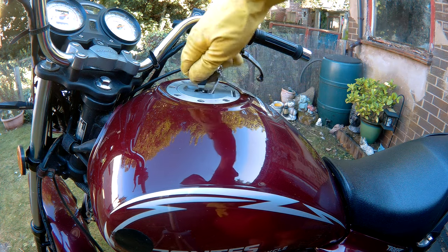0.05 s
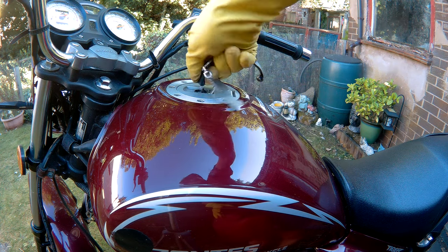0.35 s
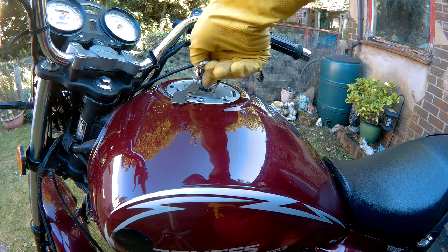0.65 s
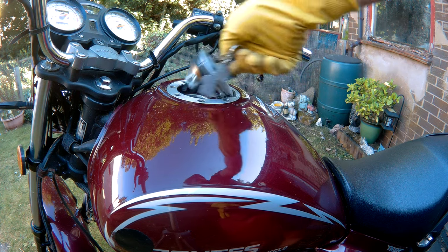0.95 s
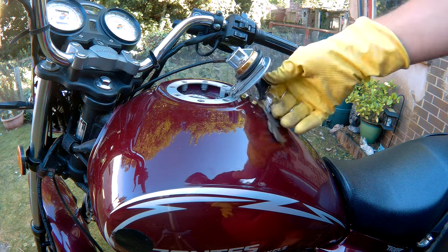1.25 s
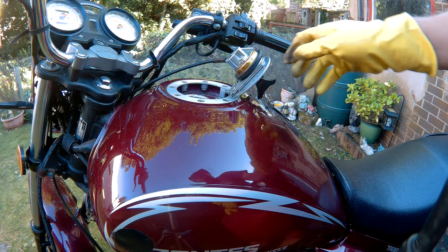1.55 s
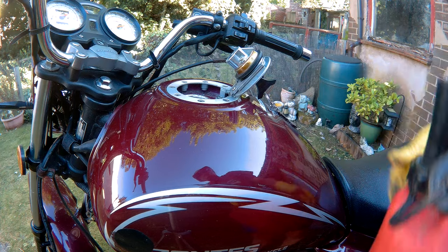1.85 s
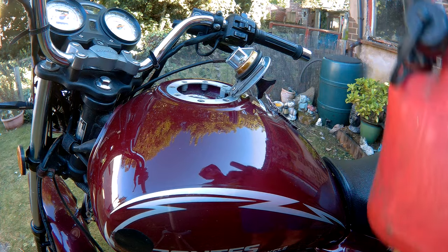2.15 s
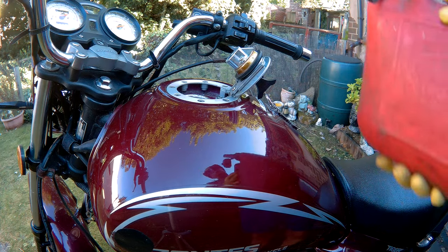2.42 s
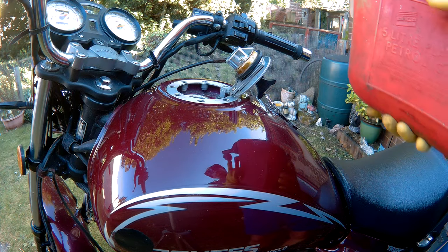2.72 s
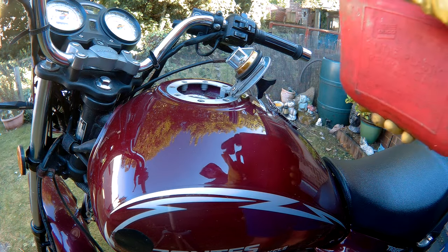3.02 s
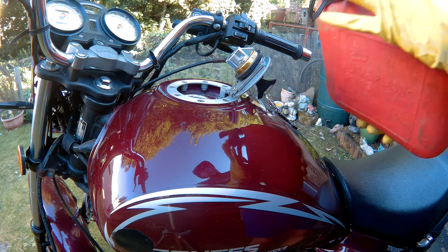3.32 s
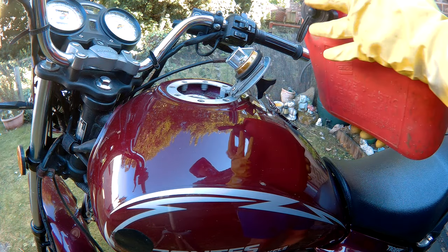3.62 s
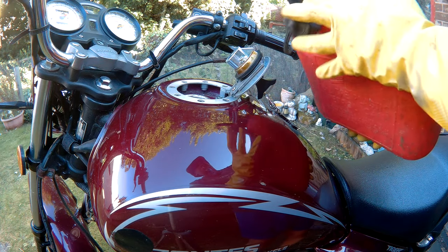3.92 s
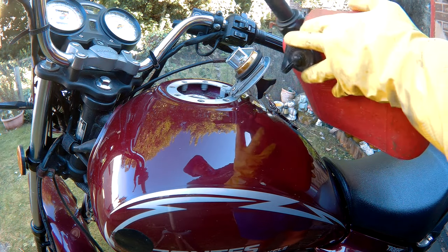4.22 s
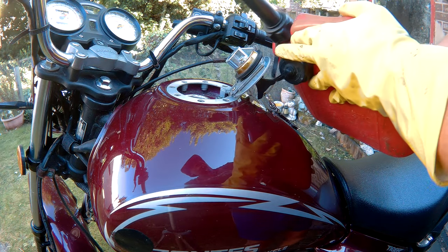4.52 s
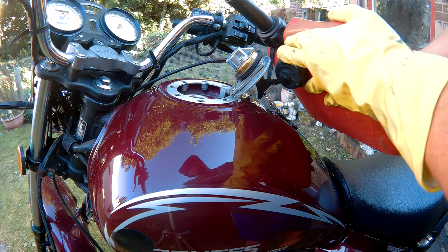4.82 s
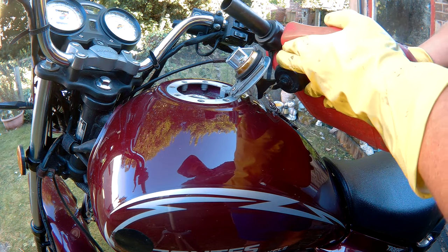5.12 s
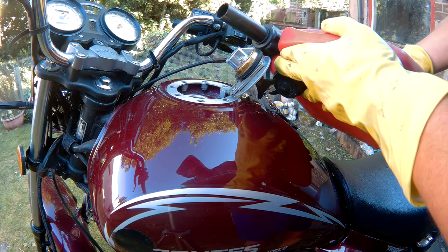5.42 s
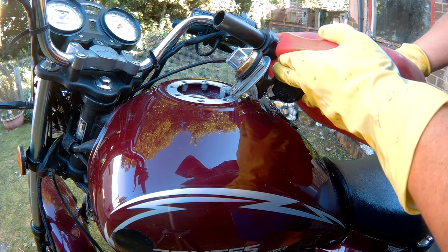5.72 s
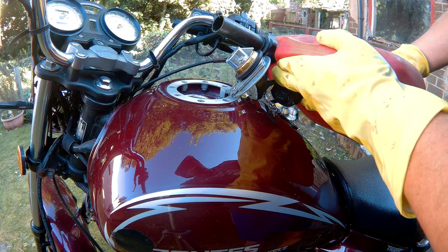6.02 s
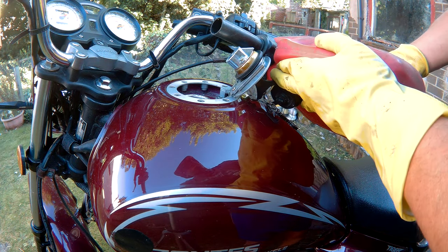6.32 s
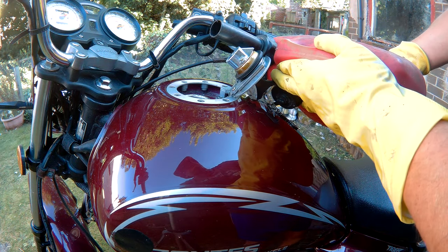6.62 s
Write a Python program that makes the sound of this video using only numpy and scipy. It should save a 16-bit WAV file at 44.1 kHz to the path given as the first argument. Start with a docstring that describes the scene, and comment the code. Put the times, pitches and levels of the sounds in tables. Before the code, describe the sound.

A key clicks in a motorcycle's metal fuel cap, which snaps open with jangling keys, then a plastic can knocks softly.

```python
"""In a quiet back yard a key is pressed into the locking cap of a motorcycle's steel fuel tank and turned.
The bolt slides back, and every click of the lock rings the hollow tank.
At about 1.3 s the cap springs open and hits its stop, and the keys swing against it.
Then gloved hands lift a plastic fuel can, which knocks softly a few times while the rubber scuffs on it.
Near 6 s a small bird chirps three times, far off."""
import sys
import numpy as np
from scipy import signal
from scipy.fft import rfft, irfft, next_fast_len
from scipy.io import wavfile

SR = 44100
rng = np.random.default_rng(int(sys.argv[2]) if len(sys.argv) > 2 else 0)


def put_to_file(sound):
    """Save the sound as 16-bit audio at rate SR, in the file named by the first command-line argument."""
    columns = np.atleast_2d(sound).T  # one column per channel
    safe = np.clip(columns, -1, 1)
    whole_steps = np.round(safe * 32767)
    wavfile.write(sys.argv[1], SR, whole_steps.astype(np.int16))


N = 293917


def from_db(db):
    """Decibels to gain."""
    return 10 ** (np.asarray(db) / 20)


def rms_one(x):
    """Scale to unit rms."""
    return x / np.sqrt(np.mean(x ** 2) + 1e-20)


def at_hz(points, hz):
    """Read a curve of (Hz, value) points on a log-frequency axis."""
    known_hz, values = np.transpose(points)
    return np.interp(np.log(np.maximum(hz, 1)), np.log(known_hz), values)


def coloured(x, colour):
    """Shape a steady signal with an EQ curve and bring it to unit rms."""
    size = next_fast_len(len(x))
    gain = from_db(at_hz(colour, np.fft.rfftfreq(size, 1 / SR)))
    return rms_one(irfft(rfft(x, size) * gain, size)[:len(x)])


def ring(times, strengths, hz, t60):
    """One mode struck at the given times: a sine that falls 60 dB in t60 seconds."""
    at = np.maximum(np.round(np.ravel(times) * SR).astype(int), 0)
    length = min(N, at.max() + int(2 * t60 * SR))
    clicks = np.bincount(at, np.ravel(strengths), length)[:length]
    decay, step = from_db(-60 / (t60 * SR)), 2 * np.pi * hz / SR
    feedback = [1, -2 * decay * np.cos(step), decay * decay]
    tone = signal.lfilter([0, np.sqrt(2) * np.sin(step)], feedback, clicks + 1e-18)
    return np.pad(tone, (0, N - length))


def strike(times, levels_db, modes, spread_db):
    """Hits on one body, each meeting each mode with its own strength and sign; levels are hits x modes."""
    hz, mode_db, t60 = np.transpose(modes)
    chance = rng.uniform(-1, 1, (len(times), 2, len(hz)))
    share = from_db(mode_db) / np.linalg.norm(from_db(mode_db))
    strengths = share * from_db(levels_db + spread_db * chance[:, 0]) * np.sign(chance[:, 1])
    return sum(ring(times, strengths[:, k], hz[k], t60[k]) for k in range(len(hz)))


def focus(modes, centre_hz, db_per_octave):
    """Where a body is struck decides which modes answer; gives dB, hits x modes."""
    return -db_per_octave * np.abs(np.log2(np.array(modes)[:, 0] / centre_hz[:, None]))


def bursts(rows, colour):
    """Contact transients: coloured noise with an instant attack and a fast decay."""
    out, t = np.zeros(N), np.arange(4096) / SR
    for start, level_db, t60 in rows:
        at = int(start * SR)
        envelope = from_db(level_db - 60 * t / t60)
        out[at:at + len(t)] += coloured(rng.standard_normal(len(t)), colour) * envelope
    return out


def radiate(x, edge_hz):
    """Below an edge set by its size, a metal part moves too little air to be heard."""
    return signal.sosfilt(signal.butter(3, edge_hz, "high", fs=SR, output="sos"), x)


# The tone of the yard's still air. Each row: frequency in Hz, relative level in dB.
AIR_COLOUR = [(12, -30.5), (20, 0.5), (232, -4), (282, -5), (427, -5.5), (465, -6), (519, -7.5),
              (597, -9.5), (649, -10.5), (1670, -18), (3640, -23.5), (5230, -26), (9930, -28),
              (13900, -28.5), (15500, -29.5)]

def yard_air(level_db=-64.5):
    """A faint, steady bed of dark hush."""
    return from_db(level_db) * coloured(rng.standard_normal(N), AIR_COLOUR)


# The tone of the echo tail. Each row: frequency in Hz, relative level in dB.
TAIL_COLOUR = [(300, 2), (2000, 0), (6000, -2), (15000, -3)]

def yard_echo(x, wet_db=-20.5, t60=0.51, predelay_s=.02):
    """House wall and fence scatter back a faint, diffuse tail."""
    t = np.arange(SR) / SR
    tail = coloured(rng.standard_normal(SR), TAIL_COLOUR) * from_db(-60 * t / t60) * (t > predelay_s)
    return from_db(wet_db) * signal.fftconvolve(x, tail / np.linalg.norm(tail))[:N]


# The bird's call. Each row: start in seconds, peak level in dB.
BIRD_CHIRPS = [(5.932, -77), (6.005, -73), (6.086, -72.5)]

def far_bird(chirp_s=0.032, from_hz=4250, to_hz=2946):
    """Short whistles, all with the same falling sweep."""
    out, size = np.zeros(N), int(chirp_s * SR)
    sweep_hz = np.linspace(from_hz, to_hz, size)
    chirp = np.hanning(size) * np.sin(2 * np.pi * np.cumsum(sweep_hz) / SR)
    for start, level_db in BIRD_CHIRPS:
        at = int(start * SR)
        out[at:at + size] += from_db(level_db) * chirp
    return out


# The fader curve of the low rustle, gloves and air together. Each row: time in seconds, level in dB.
RUSTLE_CURVE = [(0.0, -58), (0.13, -57), (0.98, -62), (1.09, -62), (1.39, -54), (1.76, -63), (2.17, -66),
                (3.08, -65), (3.32, -68.5), (3.58, -67.5), (3.73, -64.5), (4.03, -68.5), (4.27, -67.5),
                (4.4, -64), (4.56, -67), (4.99, -68.5), (6.66, -68.5)]

def hand_motion(resting_db=-69, floor_db=-80):
    """How hard the gloves rub, as a gain: the part of the rustle above still air."""
    level = from_db(np.interp(np.arange(N) / SR, *np.transpose(RUSTLE_CURVE)))
    return np.sqrt(np.maximum(level ** 2 - from_db(resting_db) ** 2, from_db(floor_db) ** 2))


# The gloves' dull rub and brighter crinkle. Each row: frequency in Hz, relative level in dB.
GLOVE_RUB_COLOUR = [(60, -9), (200, -1.5), (450, -0.5), (900, -0.5), (1400, -4.5), (3000, -28)]
GLOVE_CRINKLE_COLOUR = [(500, -19.5), (1000, 0.5), (1800, 1.5), (2700, -5), (4000, -8), (5300, -9),
                        (7000, -15), (15000, -17)]

def gloves(motion, rub_db=1.5, crinkle_db=-2.5, slips_per_s=2500, spread_db=2.5):
    """Rubber slides with a dull rub and crinkles in many tiny slips of uneven size."""
    slips = (rng.random(N) < slips_per_s / SR) * rng.choice([-1, 1], N)
    sizes = from_db(spread_db * np.minimum(rng.exponential(1, N), 5))
    rub = from_db(rub_db) * coloured(rng.standard_normal(N), GLOVE_RUB_COLOUR)
    crinkle = from_db(crinkle_db) * coloured(slips * sizes, GLOVE_CRINKLE_COLOUR)
    return motion * (rub + crinkle)


def stick_slip(rows, q, slips_per_s=900):
    """Surfaces catch and let go: each row is a brief swell of tiny clicks through one resonance."""
    out = np.zeros(N)
    for middle, length, level_db, hz in rows:
        size, at = int(length * SR), int((middle - length / 2) * SR)
        slips = (rng.standard_normal(SR) * (rng.random(SR) < slips_per_s / SR))[:size]
        band_hz = hz * np.exp(np.array([-.5, .5]) / q)
        grit = signal.sosfilt(signal.butter(2, band_hz, "band", fs=SR, output="sos"), slips)
        out[at:at + size] += from_db(level_db) * np.hanning(size) * rms_one(grit)
    return out


def glove_squeaks(motion, carry_s=(1.9, 4.2), per_s=4.5, length_s=0.073, pitch_hz=(1700, 2724)):
    """Rubber scuffs on the can as it is carried, louder when the hands are busy."""
    rows = []
    for slot in np.arange(*carry_s, 1 / per_s):
        middle = slot + rng.uniform(0, 2) / per_s
        hz = rng.uniform(*pitch_hz)
        relative_db = rng.uniform(-1, 2)
        rows.append((middle, length_s, relative_db, hz))
    return motion * stick_slip(rows, q=2.32)


# Slides of key and glove. Each row: middle in seconds, length in seconds, level in dB, pitch in Hz.
SLIDES = [(0.06, 0.059, -39.5, 1660), (0.112, 0.037, -38.5, 1624), (0.497, 0.029, -43.5, 1890),
          (0.535, .05, -42, 2310), (0.618, .07, -55.5, 4970), (1.92, 0.2, -64.5, 1480),
          (2.79, .05, -66, 2650), (2.85, .08, -64, 895), (3.14, 0.1, -66, 2320), (4.382, 0.078, -60, 1832)]

def scrapes():
    """The key, and later a glove, drags with a narrow, gritty rasp."""
    return stick_slip(SLIDES, q=6.8)


# The plastic can's modes. Each row: frequency in Hz, relative level in dB, ring time (t60) in seconds.
PLASTIC_MODES = [(209.7, -2, 0.082), (254, -1.5, 0.1106), (280.8, -9.5, 0.209), (362.4, 5.5, 0.073),
                 (387, -8, 0.137), (514.6, -3, 0.107), (608.5, 2, 0.054), (753, -12, 0.1),
                 (924.5, 1.5, 0.12), (1056.5, 0.5, 0.11), (1238, -13, 0.1), (1434, -26, 0.07),
                 (1563, 2, 0.028), (1940, -8, 0.052), (2204, -1.5, .04), (2780, -4, 0.058)]

def can_hit(start, level_db, pitch_hz, ring_scale):
    """One hit on the plastic can; the grip sets how long it rings."""
    held = np.array(PLASTIC_MODES) * [1, 1, ring_scale]
    levels_db = level_db + focus(held, np.array([pitch_hz]), db_per_octave=9.5)
    return strike([start], levels_db, held, spread_db=0)


# Knocks on the can. Each row: start in seconds, relative tick and boom levels in dB,
# boom pitch in Hz, factor on the boom's ring time.
CAN_KNOCKS = [(2.439, -54.5, -59, 950, .6), (2.452, -66.5, -50, 200, .8), (2.832, -47, -68, 950, 1),
              (3.027, -42, -34.5, 247, 1.5), (3.142, -52.5, -49, 487, 0.4), (3.548, -39, -38, 916, 1.2),
              (3.815, -43, -40.5, 980, 0.52), (4.285, -37.5, -36, 323, 1.1), (4.364, -53.5, -45, 400, .6),
              (4.403, -58, -45, 328.4, 0.65)]
# The tone of a tick on plastic. Each row: frequency in Hz, relative level in dB.
CAN_TICK_COLOUR = [(120, -1), (300, -6.5), (1000, 2.5), (1900, -1), (2500, -20), (2900, -23), (3500, -29.5),
                   (6000, -48), (15000, -47)]

def can_knocks(body_db=3.0, boom_lag_s=.007, tick_t60=0.0357):
    """A tick and a clack of the wall, then the short boom of the hollow just after."""
    body = np.zeros(N)
    for start, tick_db, boom_db, boom_hz, ring_scale in CAN_KNOCKS:
        body += can_hit(start, tick_db + 0.5, pitch_hz=1350, ring_scale=0.54)   # the wall's clack
        body += can_hit(start + boom_lag_s, boom_db, boom_hz, ring_scale)
    # plastic gives under a hit, so the body gets no treble; the can is too small for deep bass
    body = signal.sosfilt(signal.butter(3, [160, 2700], "band", fs=SR, output="sos"), body)
    ticks = bursts([(start, tick_db, tick_t60) for start, tick_db, *_ in CAN_KNOCKS], CAN_TICK_COLOUR)
    soft_ticks = signal.sosfilt(signal.butter(2, 3600, fs=SR, output="sos"), ticks)
    return from_db(body_db) * body + soft_ticks


# Loose keys touching. Each row: start in seconds, level in dB.
KEY_TINKLES = [(0.917, -51), (0.926, -50.5), (0.947, -55), (1.413, -47)]
# Their thin ring. Each row: frequency in Hz, relative level in dB, ring time in seconds.
TINKLE_MODES = [(4700, 5.5, .12), (8950, -5, .2), (9080, -9, 0.13), (12650, -4, .15), (12820, -4, .12)]
# The key ring jangling. Each row: start in seconds, level in dB, decay time (t60) in seconds.
KEY_JANGLES = [(0.176, -56, .1), (0.529, -48.5, 0.067), (1.398, -38.5, 0.29), (1.450, -41.5, 0.224)]
# The sizzle of a jangle. Each row: frequency in Hz, relative level in dB.
KEY_JANGLE_COLOUR = [(2000, -28), (5000, -12.5), (6300, -6.5), (7500, 1), (9000, 3.5), (11000, -6),
                     (13000, -6), (15000, -17)]

def keys():
    """Keys ring thinly when they touch and jangle when they swing against the cap."""
    starts, level_db = np.transpose(KEY_TINKLES)
    tinkle = strike(starts, level_db[:, None], TINKLE_MODES, spread_db=-2)
    return tinkle + bursts(KEY_JANGLES, KEY_JANGLE_COLOUR)


# Jolts of the hinge. Each row: start in seconds, level in dB.
HINGE_JOLTS = [(0.8658, -50.5), (1.285, -41), (1.3955, -45.5)]
# The tank's low end. Each row: frequency in Hz, relative level in dB, ring time in seconds.
TANK_BOOM_MODES = [(317.4, -1, 0.29), (440, -2, 0.2), (514, -3, .2), (556, -4, 0.18)]

def hinge_thumps():
    """The swinging cap jolts the hinge, and the tank booms faintly."""
    starts, level_db = np.transpose(HINGE_JOLTS)
    boom = strike(starts, level_db[:, None], TANK_BOOM_MODES, spread_db=1)
    return radiate(boom, edge_hz=190)


# Snaps of latch and hinge. Each row: start in seconds, level in dB, decay time in seconds.
LATCH_SNAPS = [(0.380, -42, 0.0242), (0.768, -54, 0.02), (0.8652, -29, 0.018), (0.982, -45.5, 0.02),
               (1.1425, -44, 0.017), (1.2984, -26, 0.02), (1.396, -33.5, 0.014)]
# The tone of a snap. Each row: frequency in Hz, relative level in dB.
LATCH_COLOUR = [(60, -18.5), (230, 0), (800, -1.5), (1800, -1), (2300, -9), (3200, -2), (4200, -10.5),
                (5300, -2), (6200, -22), (7400, -10.5), (9000, -34.5), (15000, -37)]

def latch_snaps():
    """Latch and hinge give dry cracks that die at once."""
    return bursts(LATCH_SNAPS, LATCH_COLOUR)


def rebound_levels(touches, levels_db, loss_db):
    """Spread each click's levels (clicks x modes) over its touches, each weaker than the last."""
    order = np.arange(touches.shape[1])
    return (levels_db[:, None] - loss_db * order[:, None]).reshape(touches.size, -1)


# The tone of the tank's wash of weaker modes. Each row: frequency in Hz, relative level in dB.
SHELL_COLOUR = [(250, -25), (650, -24.5), (900, -18), (1250, -13.5), (1500, -2.5), (1750, 3.5), (2200, -8),
                (3300, -9), (4200, -15), (5200, -9.5), (6200, -23.5), (7400, -22), (10000, -41.5),
                (15000, -48)]
# How long that wash hangs on. Each row: frequency in Hz, ring time in seconds.
SHELL_RING_TIMES = [(250, 0.49), (1600, 0.33), (5000, 0.25), (14000, .25)]

def shell_modes(count=560, span_hz=(250, 15500)):
    """A thin steel shell has crowded modes, a few tens of Hz apart."""
    places = (np.arange(count) + rng.random(count)) / count
    hz = np.interp(places, [0, 1], np.sqrt(span_hz)) ** 2
    return np.column_stack([hz, at_hz(SHELL_COLOUR, hz), at_hz(SHELL_RING_TIMES, hz)])


# The tank's strongest modes. Each row: frequency in Hz, relative level in dB, ring time in seconds.
TANK_MAIN_MODES = [(1372, -17, .45), (1405, -16, .5), (1453, -11, .55), (1502, -10, .5), (1572, -6, .52),
                   (1626, -12, .35), (1644, -12, .4), (1696, 0, .54), (1760, -11, .35), (1799, -12, .35),
                   (1873, -10, .45), (1941, -15, .4), (2001, -12, .45), (2088, -10, .48), (2235, -17, .4),
                   (2319, -16, .42), (2395, -16, .42), (2589, -16, .42), (2740, -13, .42), (2789, -15, .42),
                   (3176, -19, .4), (3327, -17, .42), (3436, -17, .42), (3951, -23, .4), (4278, -25, .42),
                   (4538, -20, .4), (4890, -25, .38), (5095, -25, .38)]

def tank_ring(touches, ring_db, tilt_db, main_db=-3.5, wash_db=-4.0, knee_hz=1900, expansion=.2):
    """The cap passes each click on to the tank; each click's own treble tilt decides how strongly it reaches
    the higher modes."""
    def brightness_db(modes):
        octaves_up = np.log2(np.array(modes)[:, 0] / knee_hz)
        return tilt_db[:, None] * np.clip(octaves_up, 0, 2)

    # light touches of the key barely move the main modes; the cap's heavy blows do
    heavy_db = ring_db + expansion * (ring_db - ring_db.max())
    blow_db = heavy_db[:, None] + brightness_db(TANK_MAIN_MODES)
    main = strike(touches[:, 0], blow_db, TANK_MAIN_MODES, spread_db=2)
    shell = shell_modes()
    touch_db = rebound_levels(touches, ring_db[:, None] + brightness_db(shell), loss_db=7.0)
    wash = strike(touches.ravel(), touch_db, shell, spread_db=3)
    return from_db(main_db) * main + from_db(wash_db) * wash


# The cap and lock body. Each row: frequency in Hz, relative level in dB, ring time in seconds.
CAP_MODES = [(780, -16, 0.089), (905.4, -8.5, 0.22), (1063, -5.5, 0.052), (1160, -3.5, 0.033),
             (1284, -5.5, 0.12), (1353.4, -8, 0.16), (1433, -3.5, 0.026), (1504, 0.5, 0.092),
             (1634, 1, 0.046), (1860, 0.5, .06), (2020, -4, 0.073), (2359, -3, .06), (2710, 0.5, 0.023),
             (2710, -5, .08), (3150, -4.5, .07), (3335, -4.5, .07), (3750, -9, .06), (4760, -5.5, 0.073),
             (4560, -4.5, .07), (5134, -2, .08), (5270, -7, .07)]

def cap_clinks(touches, clink_db, pitch_hz, trim_db=0.5):
    """Each touch gives a short clink of the well-damped cap itself."""
    first_db = trim_db + clink_db[:, None] + focus(CAP_MODES, pitch_hz, db_per_octave=22.0)
    touch_db = rebound_levels(touches, first_db, loss_db=8.5)
    return strike(touches.ravel(), touch_db, CAP_MODES, spread_db=5.5)


# The key goes home and turns, the bolt slides, the cap lifts and hits its stop, the keys swing on it.
# Each row: start in seconds, relative tank level in dB, treble tilt in dB per octave,
# relative clink level in dB, clink pitch in Hz, gap between rebounds in seconds.
LOCK_CLICKS = [ (0.003, -45, -1.5, -56, 1700, 0.0073), (0.045, -46, 0.5, -31.5, 1350, .004),
               (0.0664, -37, -9.5, -27.5, 1590, 0.019), (0.138, -30.5, -6, -32, 1600, .004),
               (0.1488, -27.5, 1, -19, 1530, .011), (0.170, -35.5, -2.5, -37, 2200, .03),
               (0.3799, -37.5, -2.5, -20.5, 1204, .003), (0.493, -38, 3, -27, 1900, .012),
               (0.529, -35, 4, -31, 2200, .012), (0.598, -44, 3, -46.5, 4000, .022),
               (0.759, -59.5, -8, -43, 1200, .01), (0.868, -53, 3.5, -39, 1000, .002),
               (0.917, -46, 8, -44, 1600, .013), (0.982, -41, 8, -26.5, 1350, .006),
               (1.1765, -25.5, 2, -27, 1700, .012), (1.2981, -15.5, -1, -5, 1680, .0085),
               (1.3967, -18.5, 3.5, -17, 1500, .011), (1.448, -25.5, 4.5, -11.5, 2600, .012),
               (1.483, -30, 3, -18, 2600, .007), (1.600, -46.5, 4, -36, 1600, .025),
               (1.655, -46, -6, -33.5, 1600, 0.01353), (1.874, -59.5, -15.5, -47, 1500, .003)]

def lock_clicks(touch_count=4, uneven_share=.3):
    """Metal chatters on metal: a first touch and a few uneven rebounds sound both tank and cap."""
    starts, ring_db, tilt_db, clink_db, pitch_hz, gap_s = np.transpose(LOCK_CLICKS)
    order = np.arange(touch_count)
    jitter = uneven_share * rng.uniform(-1, 1, (len(starts), touch_count)) * (order > 0)
    touches = starts[:, None] + gap_s[:, None] * (order + jitter)   # seconds, clicks x touches
    return tank_ring(touches, ring_db, tilt_db) + cap_clinks(touches, clink_db, pitch_hz)


def scene():
    """The mono mix: close handling in the open air, over the yard's hush and the far bird."""
    air, motion = yard_air(), hand_motion()
    cap = radiate(lock_clicks() + keys(), edge_hz=830) + hinge_thumps() + latch_snaps()
    handling = cap + can_knocks() + scrapes()
    return (handling + yard_echo(handling) + gloves(motion) + glove_squeaks(motion) + far_bird() + air)[None]


def record(dry, cutoff_hz=15400):
    """A steep low-pass takes off the very top."""
    return signal.sosfilt(signal.ellip(10, .1, 80, cutoff_hz, fs=SR, output="sos"), dry)


dry = scene()
out = record(dry)
put_to_file(out)
```